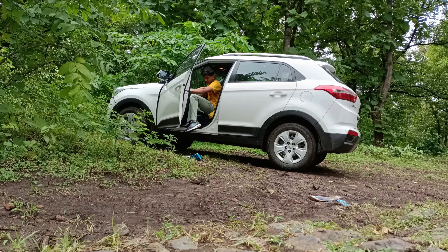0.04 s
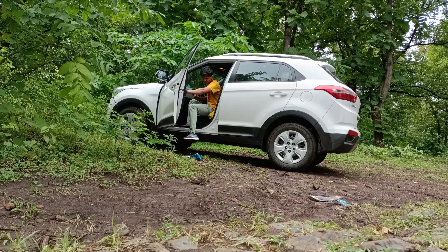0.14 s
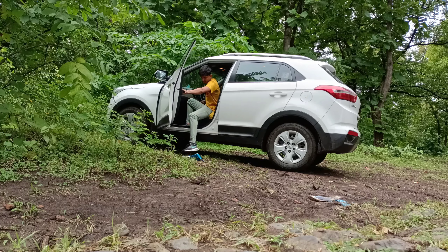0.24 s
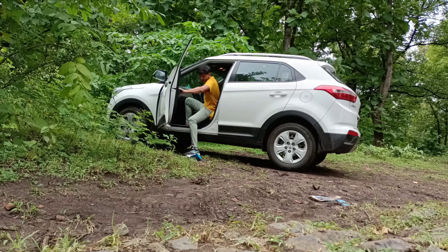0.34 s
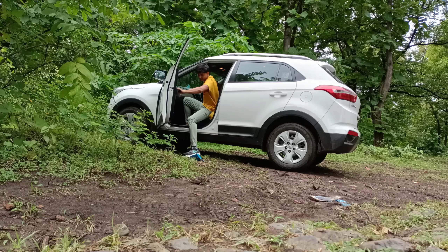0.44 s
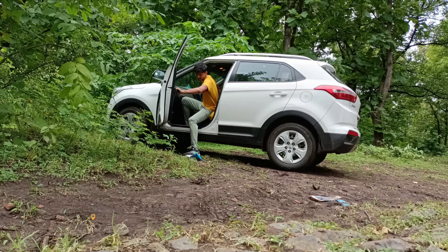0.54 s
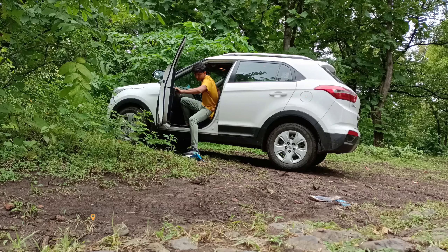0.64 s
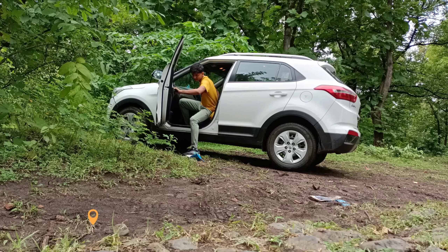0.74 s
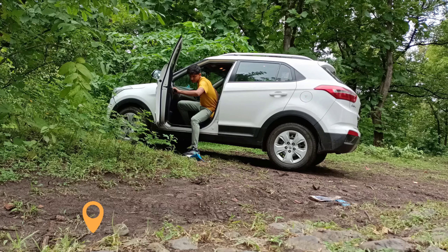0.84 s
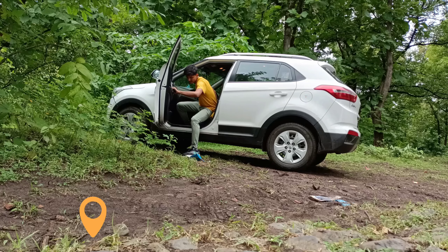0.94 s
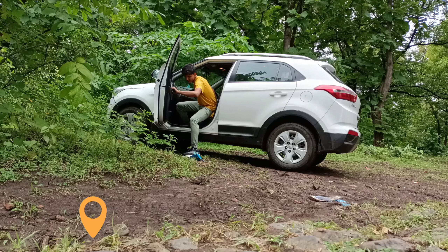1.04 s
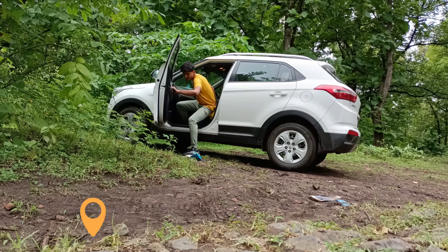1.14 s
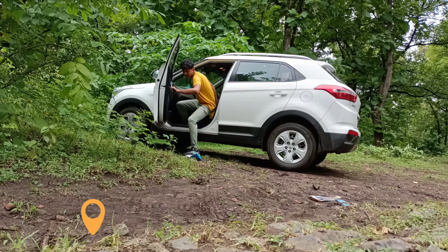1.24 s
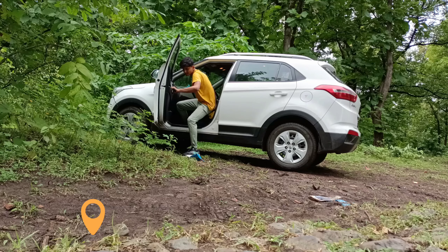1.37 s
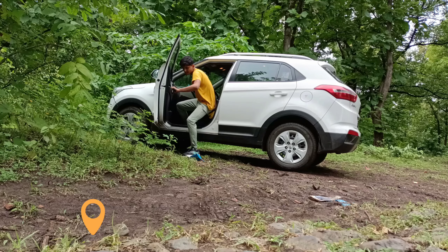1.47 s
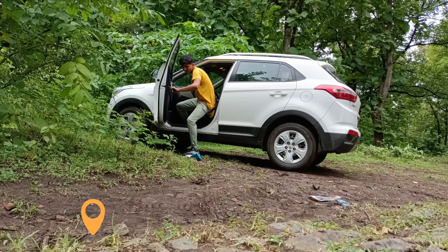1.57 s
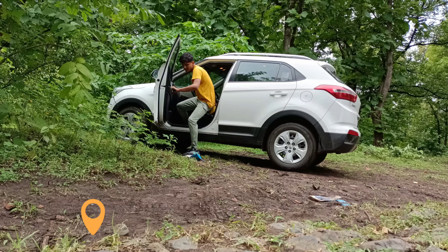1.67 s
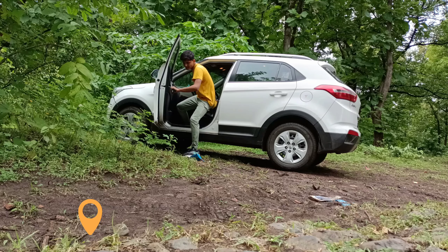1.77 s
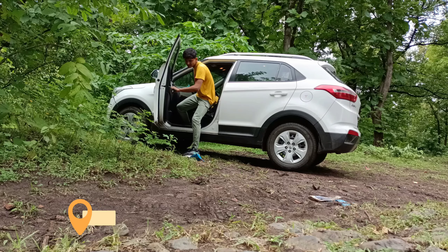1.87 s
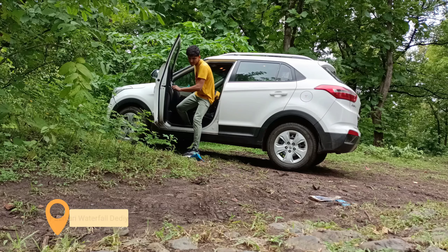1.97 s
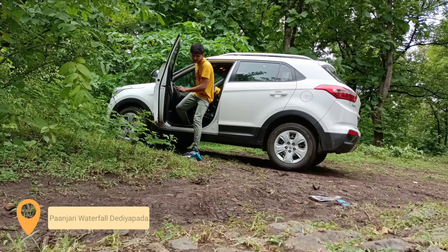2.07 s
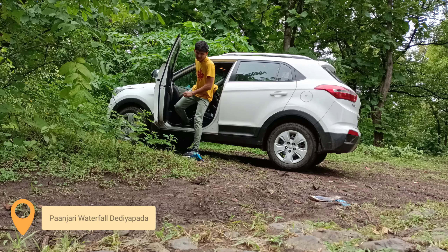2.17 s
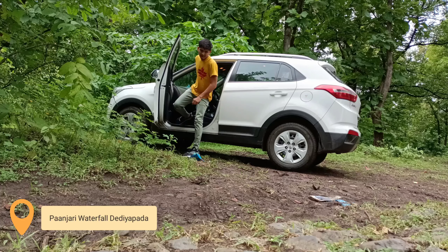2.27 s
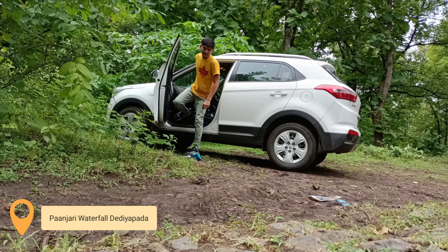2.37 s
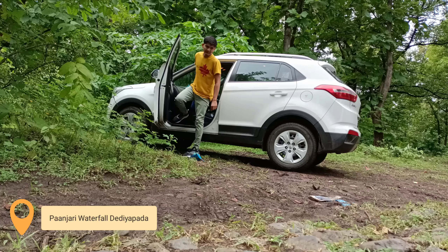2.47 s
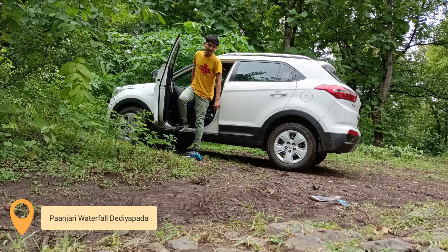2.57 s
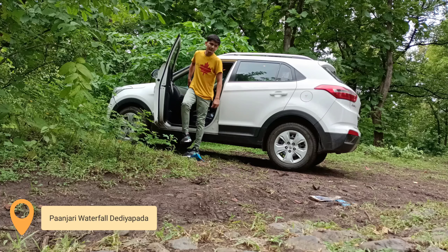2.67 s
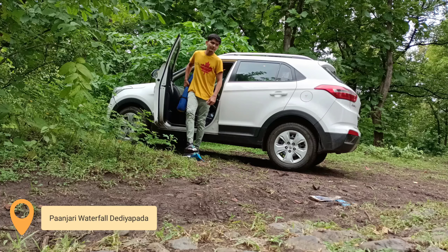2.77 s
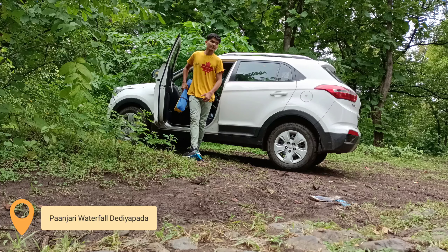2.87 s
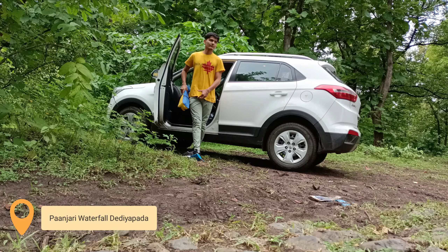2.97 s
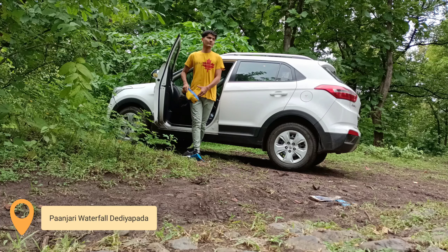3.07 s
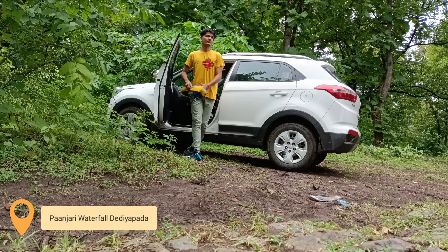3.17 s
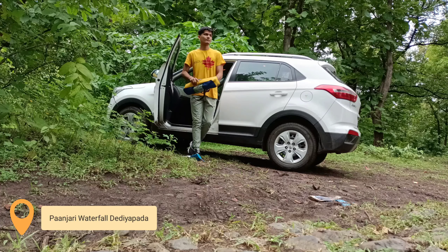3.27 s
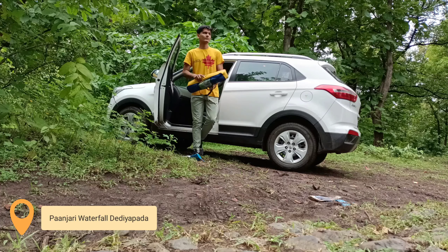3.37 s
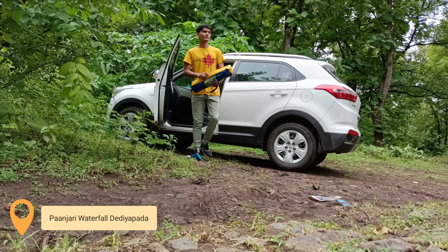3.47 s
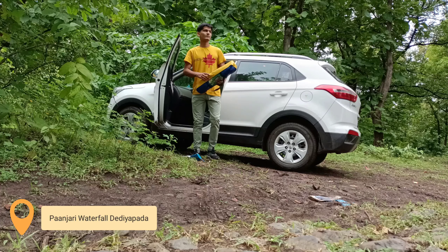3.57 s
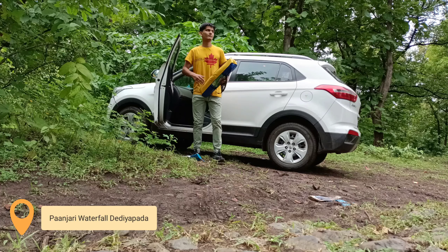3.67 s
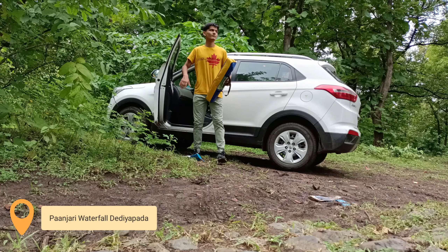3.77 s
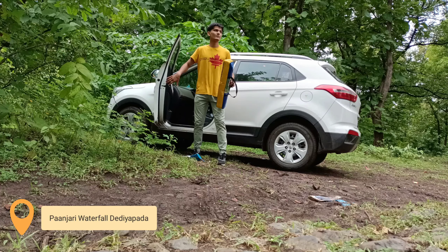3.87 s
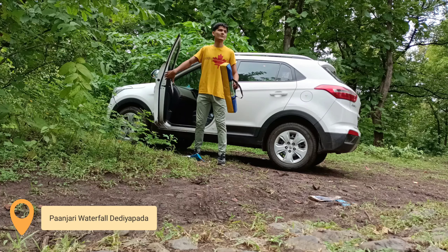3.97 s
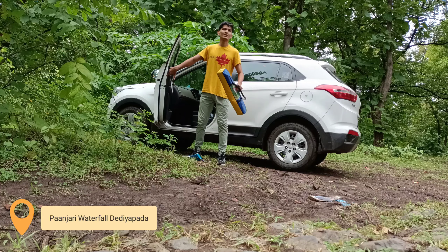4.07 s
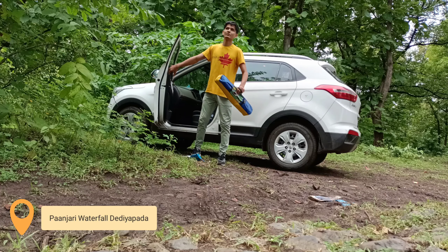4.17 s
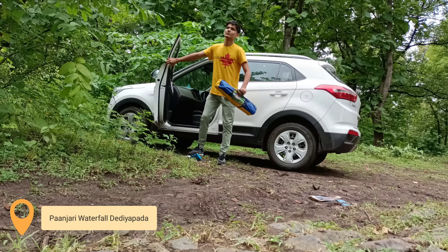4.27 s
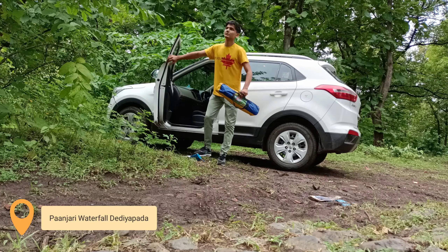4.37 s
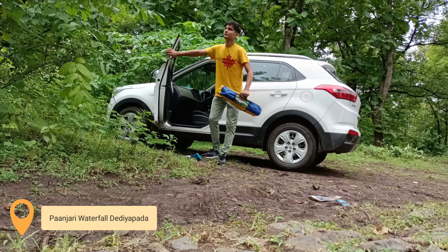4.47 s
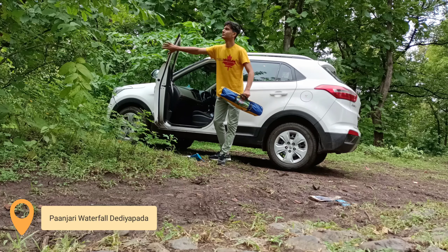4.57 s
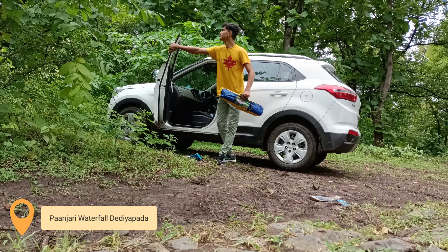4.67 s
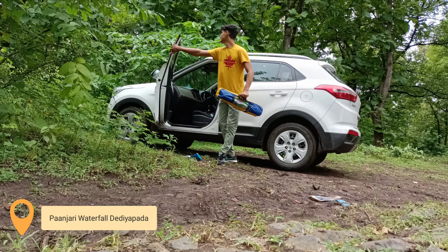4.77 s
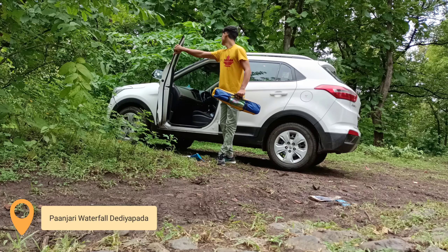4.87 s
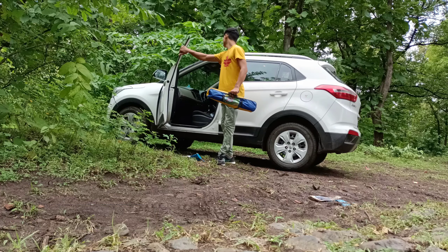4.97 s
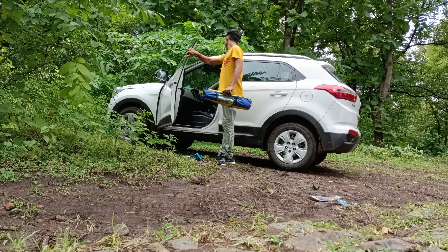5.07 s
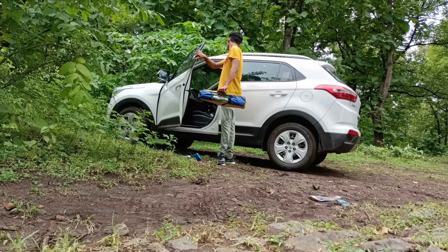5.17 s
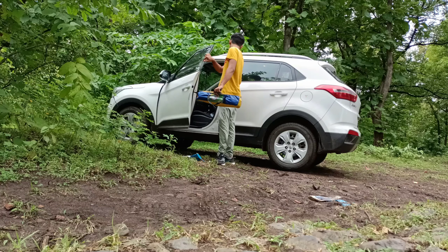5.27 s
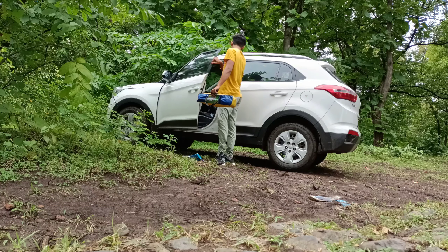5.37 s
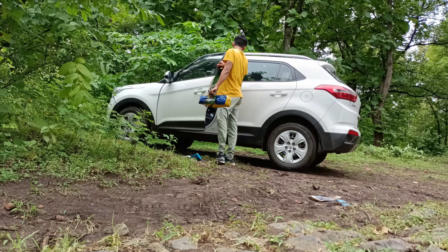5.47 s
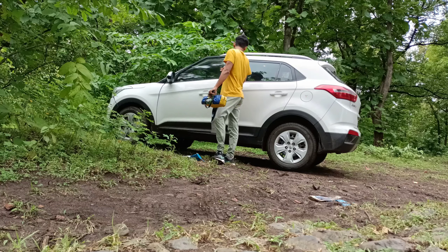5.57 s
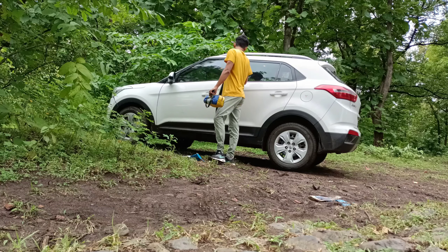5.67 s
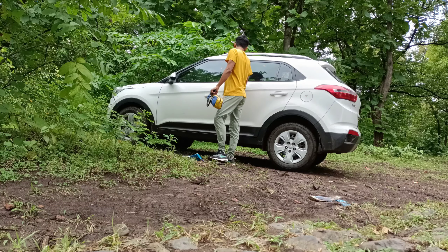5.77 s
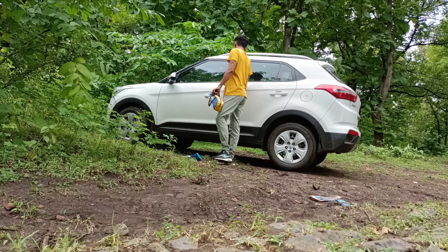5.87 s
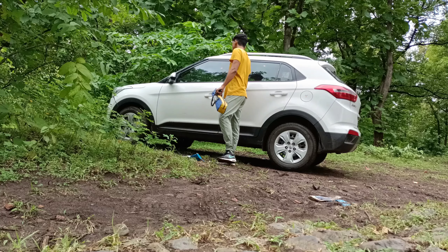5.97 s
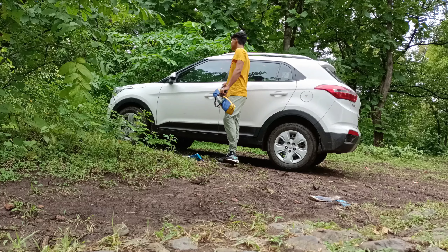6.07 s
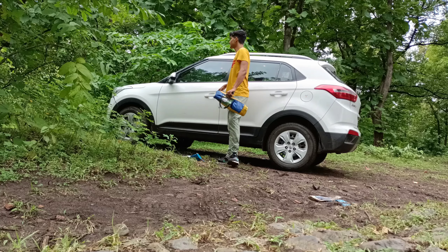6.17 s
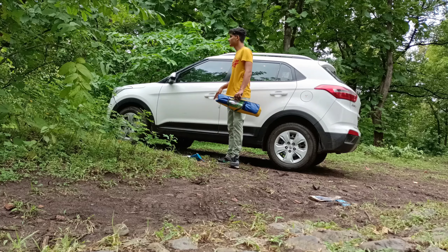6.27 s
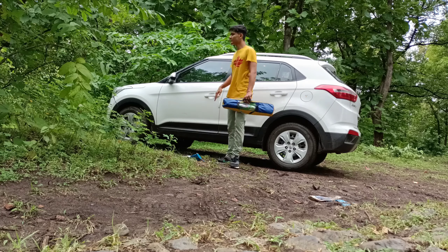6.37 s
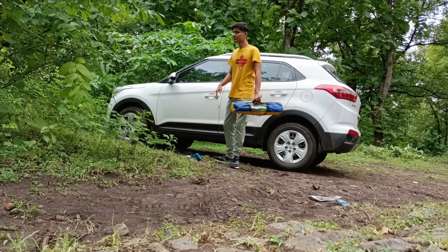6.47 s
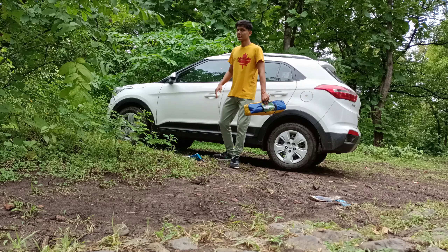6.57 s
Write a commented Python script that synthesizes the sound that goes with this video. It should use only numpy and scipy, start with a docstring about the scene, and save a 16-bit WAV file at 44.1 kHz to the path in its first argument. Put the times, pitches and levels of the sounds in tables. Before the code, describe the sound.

In a quiet forest with a faint distant rush and insect hiss, crickets chirp rapidly and a bird whistles upward about once a second. Faint bumps and knocks come from someone climbing out of a parked car with a bag. Near the end the door shuts with one loud, boomy slam and brief latch rattle, a few metres from the stereo microphones.

```python
"""In a forest, a person climbs out of a parked car and slams the door, some metres from the microphones.
Blows excite the door's damped modes and a rattle of shaped noise; a bump and knocks are short damped noise.
A bird repeats a rising whistle, a sine of swept pitch; two crickets chirp in short high sine pulses.
A distant low rush and the hiss of insects are shaped noise; the trees' echo is decaying noise, convolved."""
import sys
import numpy as np
from scipy import signal
from scipy.fft import rfft, irfft
from scipy.io import wavfile

SR = 44100
rng = np.random.default_rng(int(sys.argv[2]) if len(sys.argv) > 2 else 0)


def pcm_store(signal):
    """Save signal as 16-bit PCM."""
    levels = np.round(np.clip(np.atleast_2d(signal), -1, 1) * 32767)
    wavfile.write(sys.argv[1], SR, levels.astype(np.int16).T)


N = 292383  # length [samples]

# Likeness of the two microphones: (frequency [Hz], coherence [0-1])
COHERENCE = [(150, 1), (400, 0.86), (800, 0.59), (1400, 0.49), (3000, 0.23), (12000, 0)]
# Balance, the right microphone being deaf near 10 kHz: (frequency [Hz], left minus right [dB])
MICROPHONE_BALANCE = [(100, 0.6), (380, 0), (800, -1), (1400, -2), (2400, -1), (4400, -.5), (6700, 4.5),
                      (8000, 4), (8900, 12.5), (9700, 11.5), (10600, 11), (12000, 0.5), (14000, -1.5),
                      (15500, 0)]
# Decay of the echo among the trees: (frequency [Hz], t60 [s])
FOREST_DECAY = [(40, 0.33), (300, 0.32), (1500, 0.5), (4200, 1), (9000, 0.31)]
# Spectrum of the distant rush: (frequency [Hz], relative density [dB per Hz])
RUSH_SPECTRUM = [(12, -55), (20, -47), (53, -9.5), (86, -14.5), (178, 0.5), (280, -5), (455, -4.5),
                 (690, -14), (1500, -19), (1950, -44), (3300, -120)]
# Spectrum of the insect hiss: (frequency [Hz], relative density [dB per Hz])
HISS_SPECTRUM = [(1100, -30), (1550, -5.5), (2000, -1), (3000, 0.5), (3700, -2), (5200, -4.5), (6950, -2),
                 (7400, -9), (8100, -13), (8600, -10.5), (8950, -11), (9500, -18), (11000, -15.5),
                 (12100, -12.5), (14300, -15), (16000, -20)]
# Two crickets: (first chirp [s], chirp rate [1/s], pitch [Hz], sag in a chirp [Hz], level [dB],
# pause after HUSH_S [s])
CRICKET_SONGS = [(.010, 11.0, 9060, 40, -60, 1), (.006, 10.67, 9100, 336, -58.5, .34)]
# The bird's whistles, all of one shape: (time of the top [s], relative level [dB])
WHISTLE_TOPS = [(.291, -52.5), (1.324, -50.5), (2.326, -49), (3.340, -45), (4.464, -46), (5.498, -46.5),
                (6.454, -46.5)]
# Bumps and knocks of climbing out and handling a bag: (time [s], level [dB], centre frequency [Hz],
# crisp edge relative to the body [dB])
KNOCK_EVENTS = [(1.483, -39, 209, -48), (2.246, -36, 392, -19), (2.292, -40, 514, -17),
                (2.297, -32.5, 148, -21), (2.297, -41, 72.5, -55), (2.310, -36, 412, -22),
                (2.341, -36.5, 159, -44), (3.339, -45.5, 900, -25), (3.3906, -34.5, 845, -3),
                (3.587, -43, 900, -19), (4.184, -44, 736, -15), (4.304, -48.5, 930, -25),
                (4.774, -44, 198, -45)]
# Small bright ticks: (time [s], level [dB])
TICK_EVENTS = [(3.392, -46.5), (3.629, -55)]
# The seal touches, the door lands, the latch catches in steps, the door settles: (time [s],
# push on the panels [dB], contact time [ms], relative rattle of latch and trim [dB])
DOOR_BLOWS = [(5.8455, -16.5, 1.35, -28.5), (5.8564, 3, 2.74, -19), (5.8695, -10.5, 1.66, -50),
              (5.883, -9.5, 1.16, -23.5), (5.895, -15.5, 1.56, -38), (5.949, -12.5, 3.7, -40.5),
              (6.013, -24.5, 2.7, -43), (6.0204, -28, 1.1, -40.5)]
# Modes of the door panels and cabin air: (frequency [Hz], relative level [dB], t60 [s])
DOOR_MODES = [(25.9, -40.5, 1.6), (30, -22, 0.26), (57.5, -17, 0.17), (88.8, -33, 0.42), (99, -38.5, 0.555),
              (115.5, -11.5, 0.14), (151.3, -26, 0.18), (180.7, -31.5, 0.21), (212, -22.5, 0.17),
              (247, -17, 0.17), (315, -18, 0.11), (347, -21.5, 0.089), (373, -33.5, 0.4),
              (408, -25.5, 0.22), (450, -12.5, 0.08), (490, -28, 0.091), (535, -25, 0.11), (560, -32, 0.2),
              (680, -48, 0.25), (786, -23.5, 0.24), (886, -38.5, 0.36), (957, -30, 0.29), (1130, -22, 0.16)]
# Spectrum of the rattle: (frequency [Hz], relative density [dB per Hz])
RATTLE_SPECTRUM = [(100, -20), (350, 4.5), (800, -4.5), (1250, -10.5), (1480, -21), (1850, -11.5),
                   (2400, -18), (3500, -14), (5500, -18), (8000, -29.5), (12000, -34), (16000, -35)]
# Decay of the rattle: (frequency [Hz], t60 [s])
RATTLE_DECAY = [(200, 0.33), (1000, 0.14), (3000, 0.11), (12000, 0.095)]

RUSH_DB, HISS_DB = -49.5, -52  # rms levels before their slow drifts
HUSH_S = 5.915  # the slam silences the crickets from here
WHISTLE_S, RELEASE_S = .41, 0.015  # time to the top; fade centred on it
START_HZ, CREEP_HZ_PER_S = 3680, 650  # the pitch creeps up steadily,
CURL_HZ, CURL_S = 2327, .06  # then curls upward ever faster
STEADY_HZ = 3370  # the further above this pitch, the rougher the whistle
FULL_S, OPENING_DB = 0.35, -25  # the level is one arch: time of its peak, depth of its start
THROB_S, LAST_DIP_S, DIP_DB = .115, .35, -6.5  # brief dips: spacing, time of one dip, depth
KNOCK_OCTAVES, CRISP_HZ = 0.58, 3030  # width of a knock's body; top of its crisp edge
KNOCK_T60_S, KNOCK_DAMPING = 0.033, 0.8  # t60 at 1 kHz; power of pitch by which it shortens
SHUDDER_S, SHUDDER_SLOWING = .00838, 1.49  # first interval; growth of each next one
SHUDDER_LOSS_DB = 3  # loss at each swing
EDGE_HZ = 15780  # upper band limit
HALVES = np.array([[.5], [-.5]])  # shares a left-minus-right difference between the channels


def amp(db):
    """Decibel law: amplitude is 10 to the power dB / 20."""
    return 10 ** (np.asarray(db) / 20)


def unit(x):
    """Normalisation of power: scales to rms 1."""
    return x / np.sqrt(np.mean(x ** 2) + 1e-20)


def read(points, hz):
    """Linear interpolation of a table on a log-frequency axis."""
    f, value = np.transpose(points)
    return np.interp(np.log(hz + 1), np.log(f + 1), value)


def add(mix, s, sound):
    """Superposition: adds a sound into a two-channel mix at time s."""
    start = round(s * SR)
    sound = sound[..., max(-start, 0):]
    part = mix[:, max(start, 0):][:, :sound.shape[-1]]
    part += sound[..., :part.shape[1]]


def pair_noise(shape_db, size, likeness=1, lag_s=0):
    """Spatial coherence: shaped noise, alike in the bass and unrelated in the treble; the left may lag."""
    hz = np.fft.rfftfreq(size, 1 / SR)
    common, separate = np.exp(2j * np.pi * rng.random((2, len(hz))))
    same = np.clip(likeness * read(COHERENCE, hz), -1, 1)
    left = common * np.exp(-2j * np.pi * hz * lag_s)
    right = same * common + np.sqrt(1 - same ** 2) * separate
    level_db = shape_db(hz) + HALVES * read(MICROPHONE_BALANCE, hz)
    return unit(irfft(np.array([left, right]) * amp(level_db), size))


def drift(per_s, size):
    """Low-pass filtering of noise: a slow random curve of rms 1."""
    hz = np.fft.rfftfreq(size, 1 / SR)
    spectrum = rfft(rng.standard_normal(size)) * (hz > 0)
    return unit(irfft(spectrum / (1 + (hz / per_s) ** 4), size))


def fade(x, t60s):
    """Frequency-dependent damping: each band decays at its own rate."""
    hz, t, z = signal.stft(x, SR, nperseg=256)
    decay = amp(-60 * t / read(t60s, hz)[:, None])
    return signal.istft(z * decay, SR, nperseg=256)[1][:, :x.shape[1]]


def forest(x, build_s):
    """Diffuse scattering: echoes from trunks and leaves, different at each microphone."""
    t = np.arange(SR) / SR
    tail = fade(rng.standard_normal((2, SR)), FOREST_DECAY) * (1 - np.exp(-t / build_s))
    return signal.fftconvolve(x, tail / np.linalg.norm(tail[0]), axes=1)[:, :N]


def background(lump_db=0.53, swell_db=.5, flicker_db=0.85):
    """Shaped noise with an arrival lag: a lumpy rush far off to the right, under slowly swelling insect hiss."""
    rush = pair_noise(lambda hz: read(RUSH_SPECTRUM, hz), size=N, likeness=0.96, lag_s=0.00028)
    hiss = pair_noise(lambda hz: read(HISS_SPECTRUM, hz), size=N, likeness=0.39, lag_s=0.000328)
    rush_db = RUSH_DB + lump_db * drift(30, size=N)
    hiss_db = HISS_DB + swell_db * drift(1.1, size=N) + flicker_db * drift(16.6, size=N)
    return rush * amp(rush_db) + hiss * amp(hiss_db)


def crickets(right_db=-14, length_s=.046, uneven_db=0.5, rasp_hz=95, stray_s=.004, scatter_db=-1):
    """Stridulation: wing strokes on the left as sine pulses of sagging pitch, scattered by leaves."""
    u = np.linspace(0, 1, int(length_s * SR))  # progress through a stroke
    song = np.zeros((2, N))
    for first_s, rate, hz, sag_hz, level_db, pause_s in CRICKET_SONGS:
        for s in np.r_[first_s:HUSH_S:1 / rate, HUSH_S + pause_s:N / SR:1 / rate]:
            late, strength = rng.standard_normal(2)
            pitch = hz - sag_hz * u + rasp_hz * drift(230, size=len(u))
            chirp = np.sin(np.pi * u) * np.sin(2 * np.pi * np.cumsum(pitch) / SR)
            add(song, s + stray_s * late, amp(level_db + uneven_db * strength) * chirp)
    return (song + amp(scatter_db) * forest(song, build_s=0.0029)) * amp([[0], [right_db]])


def bird(db=0.5, pan_db=3, echo_db=-7, waver=0.034, flutter_db=2.5):
    """Frequency modulation: a throbbing sine, at first level and faint, swells and curls up, with tree echo."""
    t = np.arange(0, WHISTLE_S + RELEASE_S / 2, 1 / SR)
    out = np.zeros((2, N))
    pitch = START_HZ + CREEP_HZ_PER_S * t + CURL_HZ * np.exp((t - WHISTLE_S) / CURL_S)
    dips = np.cos(np.pi * (t - LAST_DIP_S) / THROB_S) ** 8
    shape_db = OPENING_DB * (1 - t / FULL_S) ** 2 + DIP_DB * dips
    release = np.minimum((t[-1] - t) / RELEASE_S, 1)
    for top_s, call_db in WHISTLE_TOPS:
        hz = pitch + waver * (pitch - STEADY_HZ) * drift(140, size=len(t))
        loud = release * amp(db + call_db + shape_db + flutter_db * drift(29, size=len(t)))
        phase = 2 * np.pi * np.cumsum(hz) / SR
        # a quarter cycle between the microphones
        add(out, top_s - WHISTLE_S, loud * np.array([np.sin(phase), np.cos(phase)]))
    return amp(HALVES * pan_db) * (out + amp(echo_db) * forest(out, build_s=0.0045))


def knocks(rise_cycles=0.96, echo_db=-14, ring_top_hz=330):
    """Damped impact: the deeper the bump, the softer its start and the longer and clearer its ring."""
    t = np.arange(SR // 3) / SR
    out = np.zeros((2, N))
    for s, level_db, centre_hz, crisp_db in KNOCK_EVENTS:
        t60 = KNOCK_T60_S * (1000 / centre_hz) ** KNOCK_DAMPING
        body = lambda hz: -6 * (np.log2((hz + 1) / centre_hz) / KNOCK_OCTAVES) ** 2
        edge = lambda hz: crisp_db - 20 * np.log10(1 + (hz / CRISP_HZ) ** 2)
        noise = pair_noise(lambda hz: np.maximum(body(hz), edge(hz)), size=len(t))
        ring = 2 * np.sin(2 * np.pi * centre_hz * t) / (1 + (centre_hz / ring_top_hz) ** 2)
        envelope = amp(level_db - 60 * t / t60) * (1 - np.exp(-t * centre_hz / rise_cycles))
        add(out, s, envelope * unit(noise + ring))
    return out + amp(echo_db) * forest(out, build_s=0.0091)


def ticks(centre_hz=10400, octaves=.55, t60=0.1, rise_s=.002):
    """Exponential decay of band noise: small bright ticks, as of a buckle on the bag."""
    t = np.arange(SR // 4) / SR
    out = np.zeros((2, N))
    for s, level_db in TICK_EVENTS:
        noise = pair_noise(lambda hz: -6 * (np.log2((hz + 1) / centre_hz) / octaves) ** 2, size=len(t))
        add(out, s, amp(level_db - 60 * t / t60) * (1 - np.exp(-t / rise_s)) * noise)
    return out


def swing(db=-44, grow_s=0.043, centre_hz=300):
    """Flow noise: air squeezed out by the closing door swells exponentially just before the seal touches."""
    t = np.arange(SR // 4) / SR
    air = pair_noise(lambda hz: -7 * np.log2((hz + 1) / centre_hz) ** 2, size=len(t))
    swell = np.exp((t - t[-1]) / grow_s) * signal.windows.tukey(len(t), .03)
    out = np.zeros((2, N))
    add(out, DOOR_BLOWS[0][0] - t[-1], amp(db) * air * swell)
    return out


def push(ring, s, gain, contact_ms):
    """Contact time as a low-pass: start and sound of a push centred on s, duller the longer it lasts."""
    contact_s = contact_ms / 1000
    t = np.arange(SR // 50) / SR
    force = np.sin(np.pi * np.minimum(t / contact_s, 1)) ** 2
    return s - contact_s / 2, gain * signal.fftconvolve(ring, force / force.sum())


def door(rattle_db=-5.0, rattle_pan_db=-2.0, echo_db=-24, rise_s=0.0004, count=2):
    """Modal excitation: blows make panels boom, latch and trim rattle; the hardest sets off a shudder."""
    t = np.arange(SR) / SR
    ring = sum(amp(db - 60 * t / t60) * np.cos(2 * np.pi * hz * t) for hz, db, t60 in DOOR_MODES)
    out = np.zeros((2, N))
    for s, push_db, contact_ms, shake_db in DOOR_BLOWS:
        add(out, *push(ring, s, amp(push_db), contact_ms))
        rattle = fade(pair_noise(lambda hz: read(RATTLE_SPECTRUM, hz), size=SR // 2), RATTLE_DECAY)
        rattle *= 1 - np.exp(-t[:SR // 2] / rise_s)
        add(out, s, amp(rattle_db + shake_db + HALVES * rattle_pan_db) * rattle)
    # the door shudders on its seal: swings of alternate sign, ever later and weaker
    s, push_db, contact_ms, _ = max(DOOR_BLOWS, key=lambda blow: blow[1])
    for k in range(1, count + 1):
        s += SHUDDER_S * SHUDDER_SLOWING ** (k - 1)
        add(out, *push(ring, s, (-1) ** k * amp(push_db - k * SHUDDER_LOSS_DB), contact_ms))
    return out + amp(echo_db) * forest(out, build_s=0.014)


def scene():
    """Superposition: the car's sounds amid the forest's."""
    return background() + crickets() + bird() + knocks() + ticks() + swing() + door()


def record(dry):
    """Linear filtering: the microphones' bass roll-off and band limit."""
    thinned = signal.sosfilt(signal.butter(2, 15, "high", fs=SR, output="sos"), dry)
    band_limit = signal.firwin(511, EDGE_HZ, window=("kaiser", 9), fs=SR)
    return signal.oaconvolve(thinned, band_limit[None], "same")


dry = scene()
out = record(dry)
pcm_store(out)
```